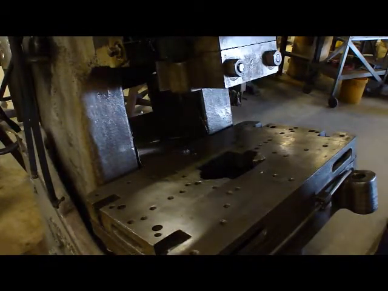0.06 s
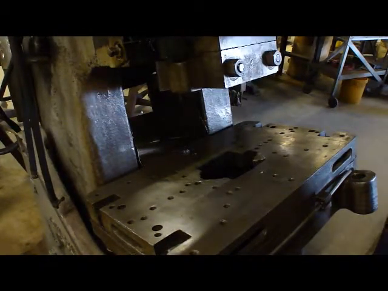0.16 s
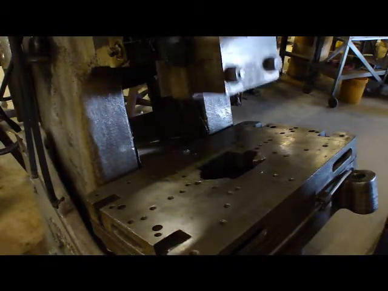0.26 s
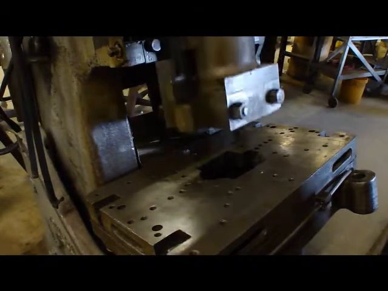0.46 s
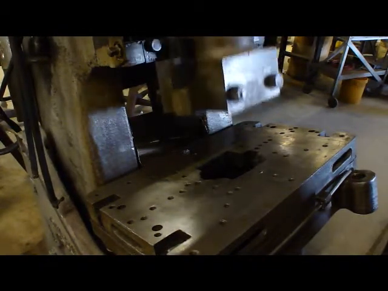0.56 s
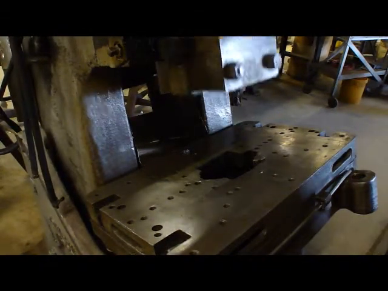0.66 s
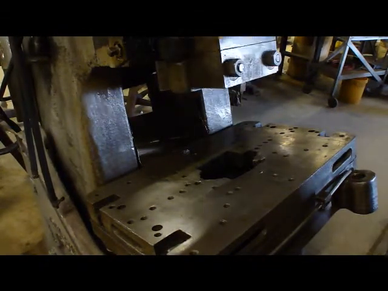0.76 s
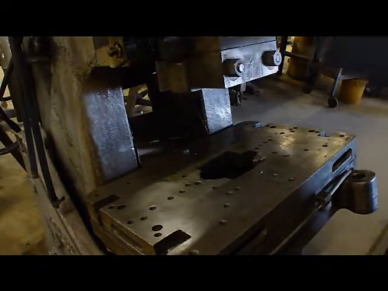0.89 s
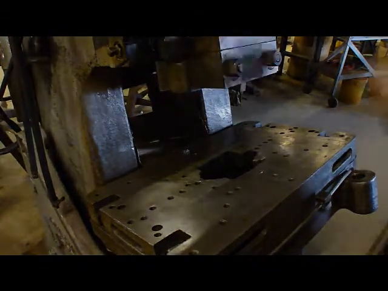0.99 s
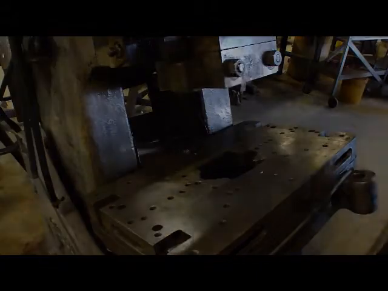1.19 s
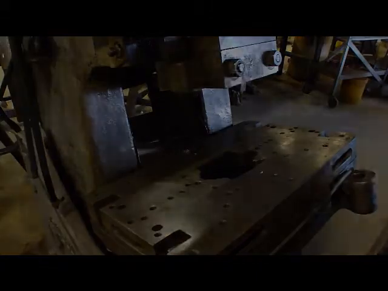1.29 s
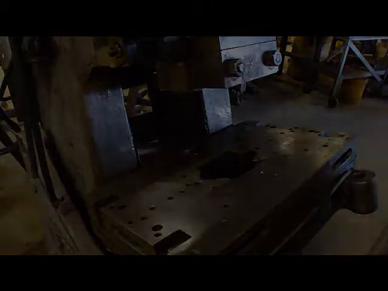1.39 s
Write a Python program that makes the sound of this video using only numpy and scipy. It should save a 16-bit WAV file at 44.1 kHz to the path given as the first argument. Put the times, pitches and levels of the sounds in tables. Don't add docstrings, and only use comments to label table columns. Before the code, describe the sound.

A punch press makes one stroke close up: a click, heavy steel clanks and gear clatter with brief metallic rings, then a steady air hiss, a sharp latch snap and a fading workshop echo over low motor hum.

```python
import sys
import numpy as np
from scipy import signal
from scipy.io import wavfile

SR = 44100
rng = np.random.default_rng(int(sys.argv[2]) if len(sys.argv) > 2 else 0)


def elevation(decibels):
    levels = np.asarray(decibels, float)
    return 10 ** (levels / 20)


def put_to_file(sound):
    columns = np.atleast_2d(sound).T
    safe = np.clip(columns, -1, 1)
    whole_steps = np.round(safe * 32767)
    wavfile.write(sys.argv[1], SR, whole_steps.astype(np.int16))


N = 63945
T = np.arange(N) / SR


def rms_one(x):
    return x / np.sqrt(np.mean(x ** 2) + 1e-20)


def curve_db(rows):
    return np.interp(T, *np.transpose(rows))


def drift(rate_hz):
    r = np.exp(-2 * np.pi * rate_hz / SR)
    wander = signal.lfilter([1], [1, -2 * r, r * r], rng.standard_normal(N + SR))
    return rms_one(wander[SR:])


def resonate(x, hz, width_hz):
    r = np.exp(-np.pi * width_hz / SR)
    poles = [1, -2 * r * np.cos(2 * np.pi * hz / SR), r * r]
    return signal.lfilter([(1 - r * r) / 2, 0, (r * r - 1) / 2], poles, x)


def band(x, hz, octaves):
    half = max(octaves, .1) / 2
    edges = np.clip(hz * 2 ** np.array([-half, half]), 10, SR * .45)
    return signal.sosfilt(signal.butter(2, edges, "band", fs=SR, output="sos"), x)


def colour(sources, spectrum, patchy_db, tilt_db=0):
    hz, db = np.transpose(spectrum)
    out, plain, together = 0, 0, drift(13.0)
    for k, centre in enumerate(28 * 2 ** np.arange(0, 9, .5)):
        level_db = np.interp(np.log(centre), np.log(hz), db)
        flicker_db = patchy_db * (0.69 * together + drift(20.7))
        part = band(sources[k % 2], centre, 0.54) * elevation(level_db + flicker_db)
        plain = plain + part
        out = out + part * elevation(tilt_db * centre / 11000)
    return out / np.sqrt(np.mean(plain ** 2))


def grains(shape, spread_db):
    size = elevation(spread_db * np.minimum(rng.exponential(1, shape), 4))
    return size * rng.choice([-1, 1], shape)


# pitch_hz, level_db (per Hz)
MOTOR_SPECTRUM = [(20, -1.5), (100, -11), (250, -6), (450, -13.5), (1200, -12), (3200, -15.5), (4500, -23),
                  (11000, -37)]
# pitch_hz, level_db
HUM_LINES = [(120, -59), (242, -49), (360, -45), (570, -53)]


def motor():
    out = elevation(-40) * colour(rng.standard_normal((2, N)), MOTOR_SPECTRUM, patchy_db=0.23)
    for hz, db in HUM_LINES:
        phase = 2 * np.pi * np.cumsum(hz + 0.8 * drift(9.5)) / SR
        out += elevation(db + 1.5 * drift(4.9)) * np.sin(phase)
    return out


# time_s, level_db
MESH_LEVEL = [
    (.34, -55),
    (.42, -34),
    (.55, -36),
    (.66, -39),
    (.72, -35),
    (.828, -39),
    (.842, -54),
    (.88, -41),
    (1.05, -60),
]
MESH_HZ, MESH_HALF_DB = 329.8, -8.5


def mesh():
    phase = 2 * np.pi * np.cumsum(MESH_HZ + 2.62 * drift(5.2)) / SR
    tooth = elevation(0.36 * drift(8.1)) * np.sin(phase)
    half = elevation(MESH_HALF_DB + 1.6 * drift(7.6)) * np.sin(phase / 2)
    return elevation(curve_db(MESH_LEVEL)) * (tooth + half)


def blows(rows, t60_s):
    out, t = np.zeros(N + SR), T[:SR // 4]
    first_touch = 1 + elevation(5.0) * np.exp(-t / 0.00037)
    for (s, db, hz, length_s, octaves), grit in zip(rows, grains((len(rows), len(t)), 1.5)):
        decay_s = t60_s * (2000 / hz) ** 0.16
        shape = elevation(-60 * np.maximum(t - length_s, 0) / decay_s)
        blow = band(shape * grit * first_touch, hz, octaves)
        same_energy = np.sqrt(np.sum(shape ** 2) / np.sum(blow ** 2))
        out[int(s * SR):][:len(t)] += elevation(db + 1.5) * blow * same_energy
    return out[:N]


# start_s, level_db, pitch_hz, rattle_s, width_octaves
CLACK_BLOWS = [(.195, -43, 4530, 0.00076, 2.2), (.2164, -26, 3530, 0.00074, 2.1),
               (.2168, -24, 7900, 0.0029, 0.69), (.2292, -21.5, 7100, 0.0034, 0.69),
               (.278, -26, 5300, 0.008, 0.69), (.291, -13.5, 2660, 0.0096, 1.4),
               (.290, -19, 6420, 0.015, 0.68), (.328, -22.5, 3500, 0.0043, 0.46),
               (.347, -13, 7900, 0.0015, 4.2), (.359, -16, 3520, 0.0039, 0.71),
               (.379, -24, 4500, 0.0068, 0.98), (.555, -21, 6270, 0.0065, 1),
               (.8328, -17, 6100, 0.0013, 1.36), (.8325, -18, 2030, 0.0039, 1.6),
               (.879, -46, 9300, 0.00059, 0.56)]


def clacks():
    return blows(CLACK_BLOWS, t60_s=0.055)


# start_s, peak_db, pitch_hz, width_hz
KNOCK_CONTACTS = [(.195, -24, 3900, 500), (.1951, -25, 8800, 1500), (.2152, -22, 8500, 2000),
                  (.2166, -8, 3440, 450), (.2166, -14, 3435, 70), (.2167, -15, 2320, 250),
                  (.2175, -15, 6150, 350), (.229, -13, 2650, 350), (.2299, -10, 850, 600),
                  (.2335, -15, 600, 250), (.2296, -18, 9300, 300), (.230, -19, 300, 120),
                  (.2897, -7, 1400, 1000), (.294, -16, 620, 200), (.2968, -9, 2500, 900),
                  (.3275, -15, 3500, 150), (.3459, -4, 1500, 800), (.3486, -11, 950, 500),
                  (.3507, -11, 1050, 450), (.347, -16, 400, 150), (.359, -14, 3650, 200),
                  (.379, -16, 4716, 180), (.390, -16, 590, 70), (.432, -15, 530, 80), (.482, -18, 570, 60),
                  (.4485, -10, 3100, 900), (.497, -20, 2930, 25), (.8316, -5, 4000, 1300),
                  (.8317, -7, 7000, 3000), (.8316, -10, 2300, 900), (.823, -25, 2460, 60),
                  (.876, -32, 9380, 120)]


def knocks():
    out, click = np.zeros(N + SR), np.arange(SR // 4) == 0
    for s, db, hz, width_hz in KNOCK_CONTACTS:
        knock = band(resonate(click, hz, max(width_hz, 10)), hz, 1.6)
        out[int(s * SR):][:len(knock)] += elevation(db) * knock / np.abs(knock).max()
    return out[:N]


# time_s, level_db
GEAR_LOAD = [(.2, -45), (.232, -22.5), (.27, -36), (.31, -19.5), (.34, -34), (.352, -15.5), (.39, -25),
             (.425, -17), (.442, -24), (.53, -26), (.56, -24.5), (.6, -52), (.8, -74), (.84, -42.5),
             (1.2, -74)]
# pitch_hz, level_db (per Hz)
GEAR_SPECTRUM = [(35, -53), (60, -14), (400, -11.5), (579, -2.5), (753, -6.5), (1220, -4.5), (5970, -15),
                 (6520, -26), (11000, -19.5), (14300, -54), (22000, -120)]
# pitch_hz, width_hz, level_db
FRAME_MODES = [(523, 39, -9), (890, 46, -17), (1154, 67, 12)]
# time_s, level_db
RAM_SLIDE = [
    (.23, -68),
    (.24, -32),
    (.3, -50),
    (.35, -31),
    (.43, -28.5),
    (.445, -23),
    (.49, -40),
    (.56, -42),
]
CONTACTS_PER_S, CONTACT_SPREAD_DB, FRAME_DB = 2500, 5, -6.5


def gears():
    struck = rng.random((2, N)) < CONTACTS_PER_S / SR
    ticks = grains((2, N), CONTACT_SPREAD_DB) * struck + 1e-18
    frame = sum(elevation(db) * rms_one(resonate(ticks[0], hz, width)) for hz, width, db in FRAME_MODES)
    body = colour(ticks, GEAR_SPECTRUM, patchy_db=2.5) + elevation(FRAME_DB) * rms_one(frame)
    slide = rms_one(band(rng.standard_normal(N), 7260, 0.84)) * elevation(2.54 * drift(97))
    slide = elevation(curve_db(RAM_SLIDE)) * slide * (T < RAM_SLIDE[-1][0])
    return (T > GEAR_LOAD[0][0]) * (elevation(curve_db(GEAR_LOAD)) * body + slide)


# knock_s, touched_s, pitch_hz, t60_s
RINGING_PARTS = [(.2168, .234, 3430, .035), (.4485, .493, 2924, .5), (.452, .499, 2094, .9),
                 (.493, .517, 3465, .15), (.494, .52, 5490, .15), (.463, .474, 5490, .1),
                 (.499, .52, 2094, .2), (.529, .558, 2094, .15), (.529, .54, 3465, .1),
                 (.544, .557, 2915, .3), (.579, .612, 3500, .3), (.546, .562, 3465, .2),
                 (.336, .356, 6570, .3), (.358, .415, 6570, .3), (.425, .438, 7090, .3),
                 (.441, .452, 7090, .2), (.358, .385, 10430, .2), (.4, .42, 5290, .2), (.727, .76, 2450, .3),
                 (1.17, 1.22, 1680, .4), (1.39, 1.45, 1445, .9), (.2295, .237, 460, .1),
                 (.347, .37, 230, .15), (.552, .575, 330, .12), (.832, .8345, 2480, .03),
                 (.352, .378, 510, .2)]
RINGING_DB = [-24, -7, -9, -15, -25, -23, -27, -20, -22, -17, -24, -22, -28, -19, -21, -21, -22, -30, -28,
              -42, -44, -13, -18, -24, -12, -15]
TOUCH_T60_S, RING_ROUGH_DB = .018, 3.0


def rings():
    out, rough = np.zeros(N), drift(330)
    chances = rng.random((len(RINGING_PARTS), 2))
    for (knock_s, touched_s, hz, t60_s), db, (phase, lag) in zip(RINGING_PARTS, RINGING_DB, chances):
        t = T - knock_s
        fall_db = -60 * (np.maximum(t, 0) / t60_s + np.maximum(T - touched_s, 0) / TOUCH_T60_S)
        chatter_db = RING_ROUGH_DB * hz / 5000 * np.roll(rough, int(lag * N))
        onset = np.clip(t / 0.0004, 0, 1)
        out += onset * elevation(db + fall_db + chatter_db) * np.sin(2 * np.pi * (hz * t + phase))
    return out


# start_s, level_db, pitch_hz, rattle_s, width_octaves
THUMP_BLOWS = [(.2285, -18.5, 1450, 0.0071, 1.85), (.2312, -32, 534, 0.0062, 2.7),
               (.2896, -17, 1350, 0.0033, 1.4), (.320, -22.5, 1150, 0.002, 1.3),
               (.329, -24, 1110, 0.0028, 2.1), (.3462, -15.5, 1370, 0.00076, 1.6),
               (.349, -10.5, 645, 0.0053, 2.6), (.361, -20.5, 477, 0.0051, 0.97),
               (.391, -46, 736, 0.0036, 0.68), (.412, -25.5, 630, 0.014, 0.62),
               (.4242, -21, 1270, 0.0022, 7.1), (.434, -25, 583, 0.014, 0.28),
               (.545, -21.5, 1280, 0.0032, 0.85), (.556, -18, 477, 0.0032, 0.81),
               (.395, -34, 117, 0.045, 0.89)]


def thumps():
    return blows(THUMP_BLOWS, t60_s=0.051)


# time_s, level_db
AIR_FLOW = [
    (.552, -35),
    (.557, -27.5),
    (.62, -27),
    (.78, -28),
    (.828, -28),
    (.84, -32),
    (.94, -31.5),
    (1.19, -41),
    (1.45, -102),
]
# pitch_hz, level_db (per Hz)
JET_SPECTRUM = [(300, -56), (600, 0.5), (2420, 3), (4170, -1.5), (5760, 1.5), (7800, -4), (11000, -11)]
# pitch_hz, width_hz, level_db
PIPE_MODES = [(1233, 46, -6), (1670, 360, 7.5), (2470, 390, 2), (3500, 240, 8.5), (4560, 42, -26),
              (5550, 34, 4.5), (6300, 16, 3), (7000, 46, -30), (9540, 470, 9.5)]
JET_DULLS, PIPE_DULLS = 1.71, 2.42


def exhaust():
    flow_db, white = curve_db(AIR_FLOW), rng.standard_normal((2, N))
    tilt_db = JET_DULLS * (flow_db - flow_db.max())
    jet = colour(white, JET_SPECTRUM, patchy_db=0.23, tilt_db=tilt_db)
    pipe = 0
    for hz, width_hz, db in PIPE_MODES:
        mode_db = db + PIPE_DULLS * tilt_db * (hz - 3000) / 11000
        pipe = pipe + elevation(mode_db) * rms_one(resonate(white[1], hz, width_hz))
    return elevation(flow_db) * (jet + elevation(-17.5) * pipe) * (T > AIR_FLOW[0][0])


HALL_T60_S, HALL_DB, HALL_CUT_HZ, HALL_GAP_S = 1.16, -13.5, 1600, 0.0099


def hall(x):
    white, fall_db = rng.standard_normal((2, N)), -60 * T / HALL_T60_S
    low = signal.sosfilt(signal.butter(1, HALL_CUT_HZ, fs=SR, output="sos"), white[0])
    high = 0.81 * band(white[1], 3700, 2.65)
    tail = low * elevation(fall_db) + high * elevation(2.58 * fall_db)
    tail = tail * np.clip(T / HALL_GAP_S - 1, 0, 1)
    return elevation(HALL_DB) * signal.fftconvolve(x, tail / np.sqrt(np.sum(tail ** 2)))[:N]


def scene():
    press = clacks() + thumps() + knocks() + gears() + exhaust()
    loose = rings()
    echoes = hall(press + elevation(-8) * loose)
    return np.tile(press + loose + echoes + mesh() + motor(), (2, 1))


def low_pass(x):
    return signal.sosfilt(signal.butter(12, 11920, fs=SR, output="sos"), x)


MIC_CUT_HZ, CUTOFF_HZ = 195, 10950
LIMIT_DB, LIMIT_SHARE, LIMIT_ATTACK_S, RECOVER_DB_PER_S = -13, .6, .0015, 300


def record(dry):
    x = signal.sosfilt(signal.butter(2, MIC_CUT_HZ, "high", fs=SR, output="sos"), dry)
    ramp_db = RECOVER_DB_PER_S * T
    held_db = np.maximum.accumulate(20 * np.log10(np.abs(x[0]) + 1e-6) + ramp_db) - ramp_db
    duck_db = LIMIT_SHARE * np.maximum(held_db - LIMIT_DB, 0)
    r = np.exp(-1 / (LIMIT_ATTACK_S * SR))
    x = x * elevation(-signal.lfilter([1 - r], [1, -r], duck_db))
    rounded = .55 * np.tanh(x / .55)
    soft = signal.sosfilt(signal.butter(1, 70, "high", fs=SR, output="sos"), rounded)
    steep = signal.ellip(14, .5, 62, CUTOFF_HZ, fs=SR, output="sos")
    return low_pass(signal.sosfilt(steep, soft))


dry = scene()
out = record(dry)
put_to_file(out)
```